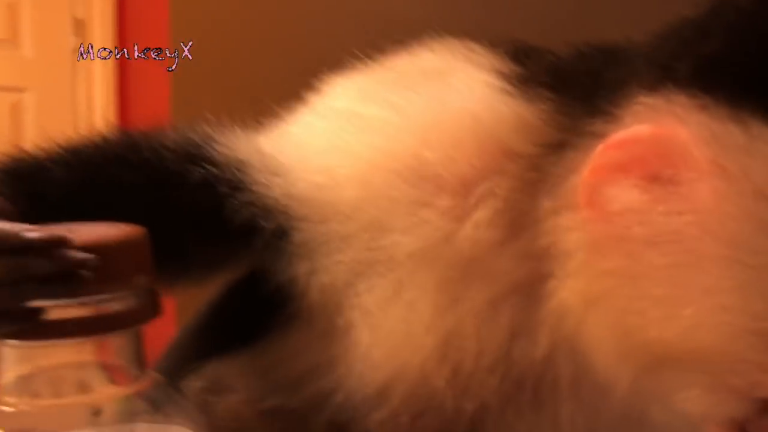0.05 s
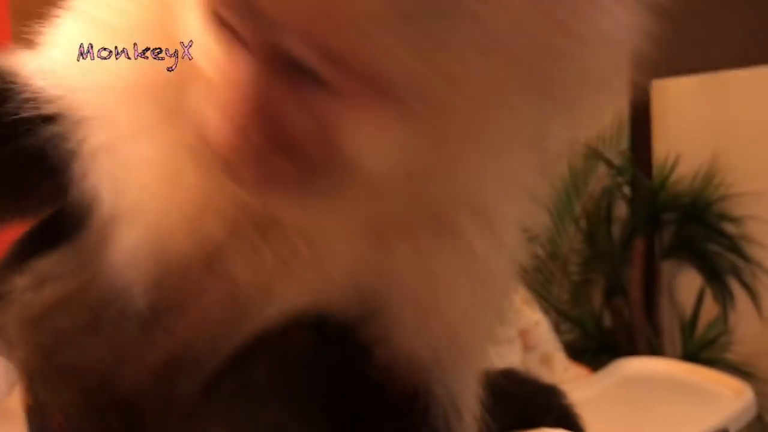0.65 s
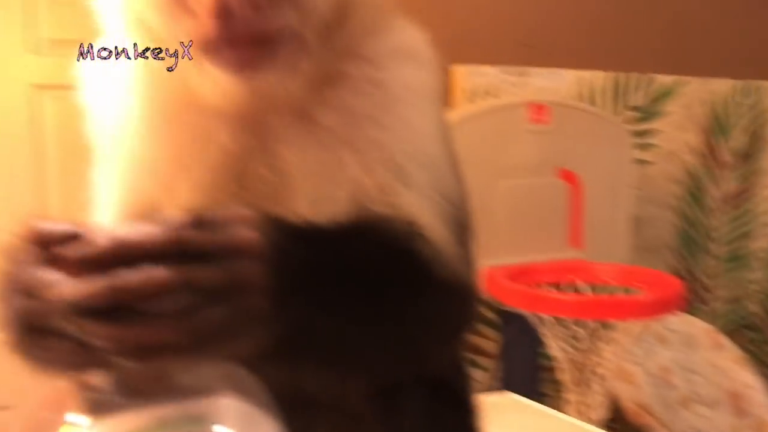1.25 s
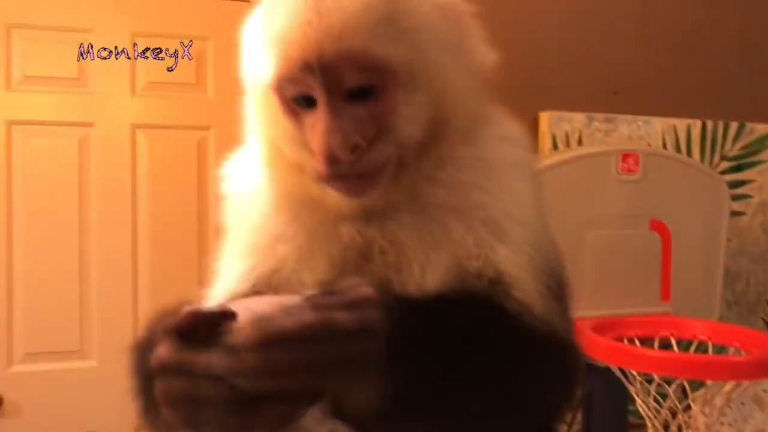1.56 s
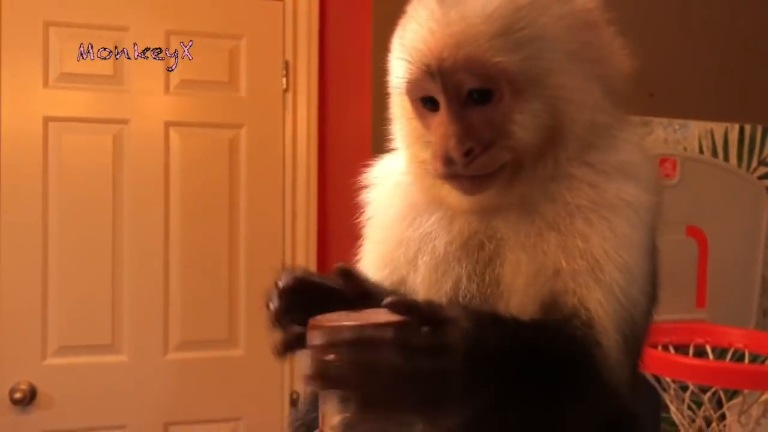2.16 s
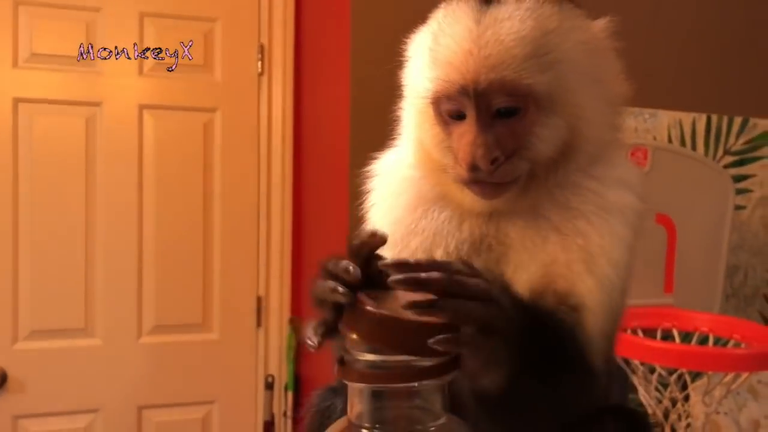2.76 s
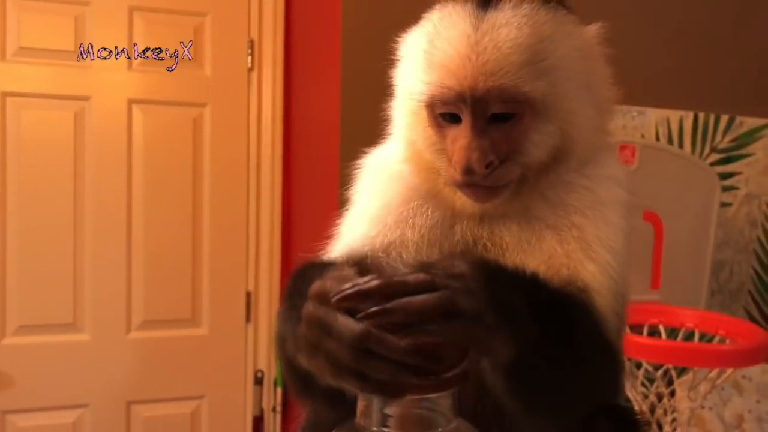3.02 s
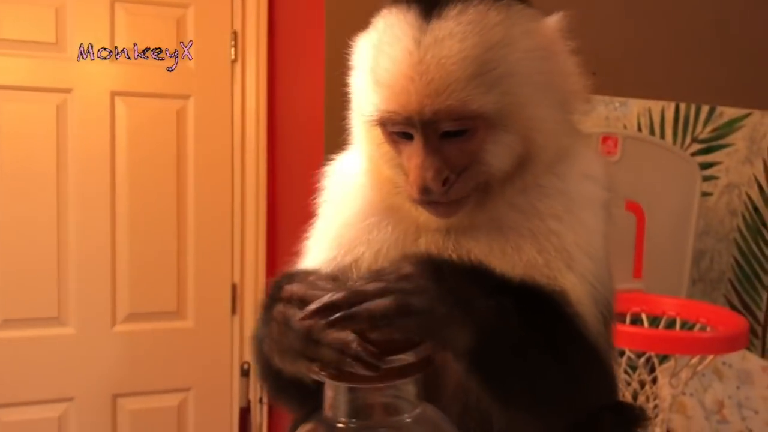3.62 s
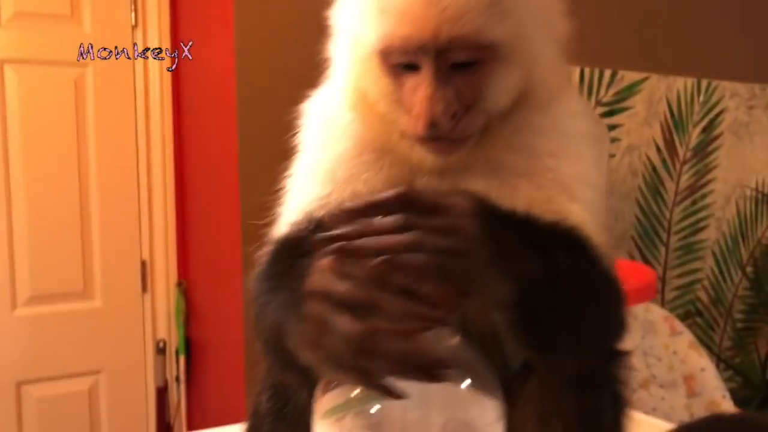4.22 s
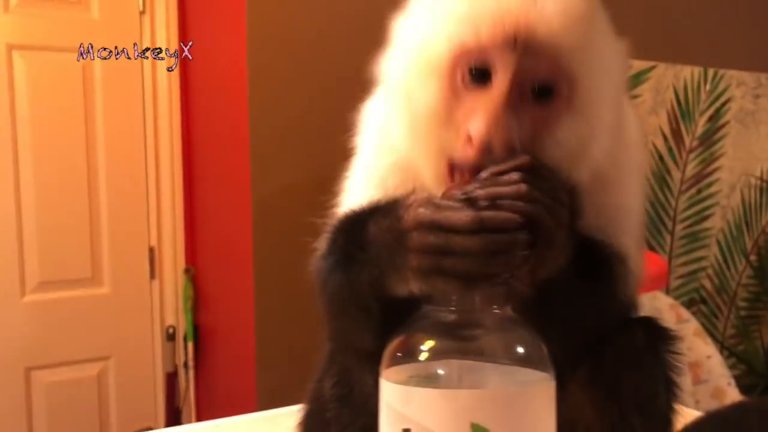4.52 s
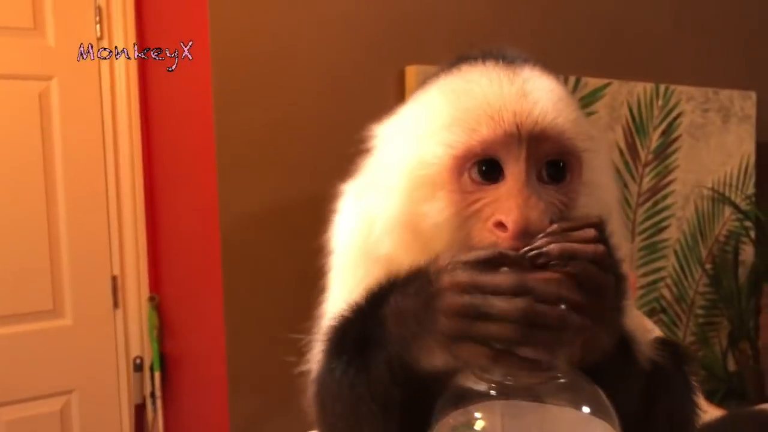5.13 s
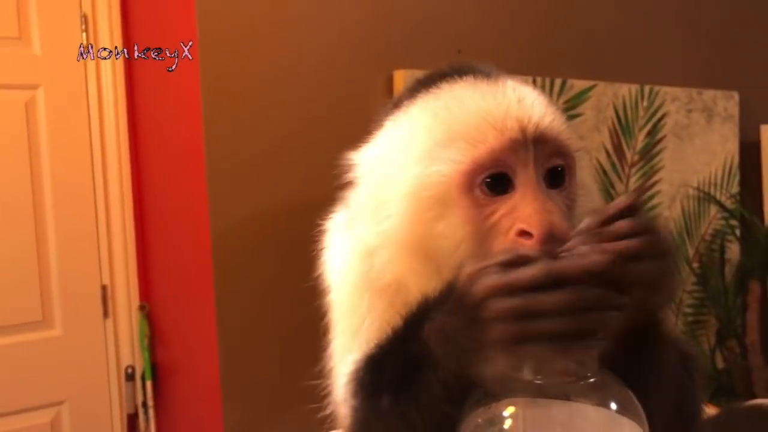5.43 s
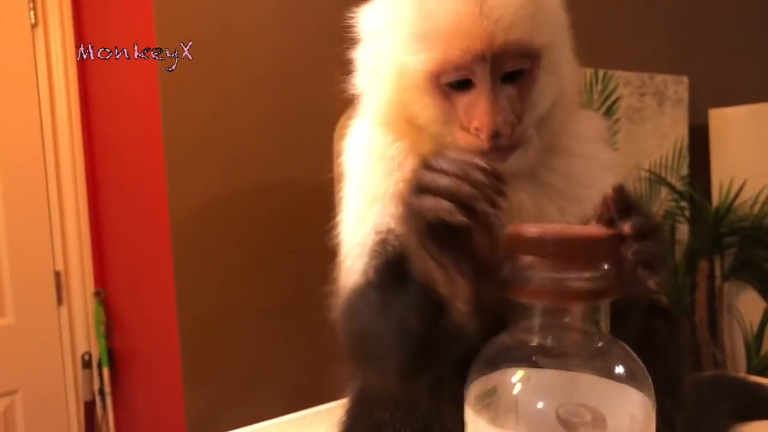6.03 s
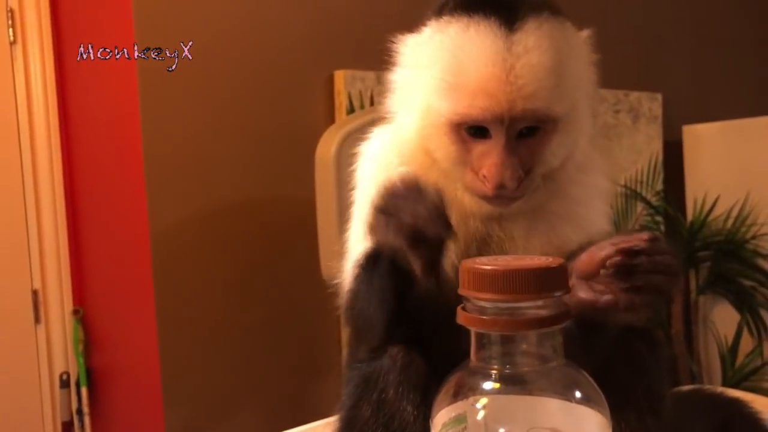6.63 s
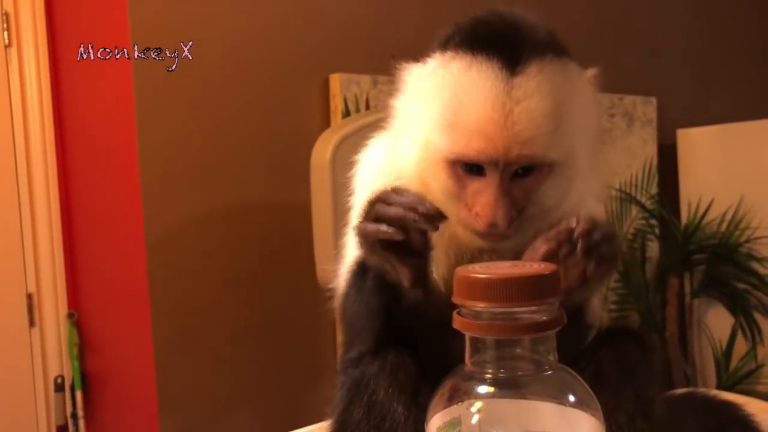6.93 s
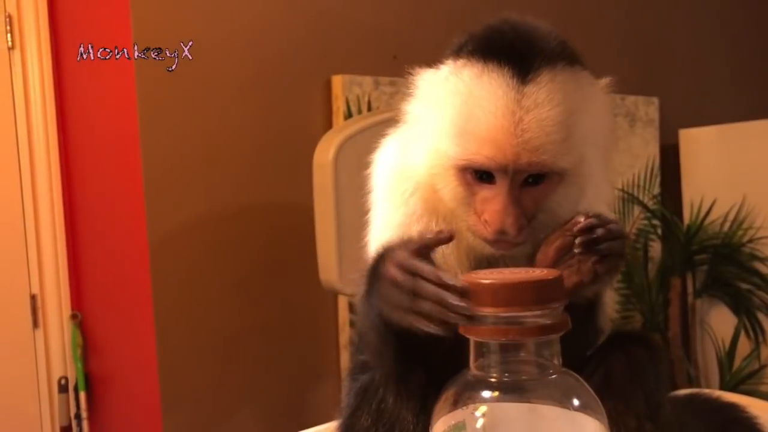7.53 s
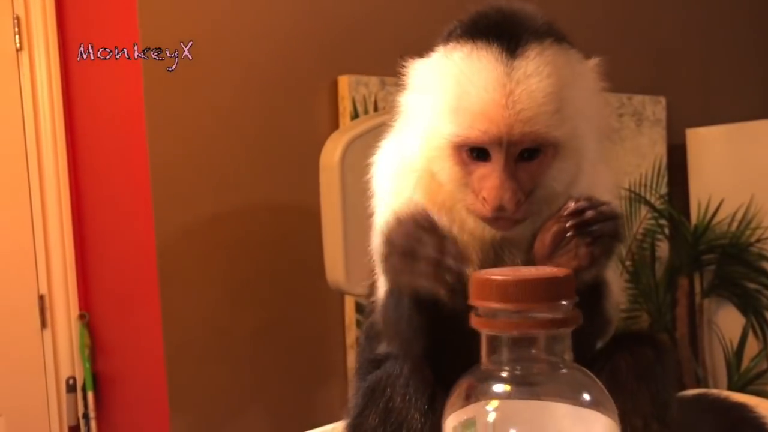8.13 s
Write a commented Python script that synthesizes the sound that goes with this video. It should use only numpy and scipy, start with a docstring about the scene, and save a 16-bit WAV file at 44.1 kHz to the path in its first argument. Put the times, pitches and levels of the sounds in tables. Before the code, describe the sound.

Irregular clicks, taps and rasping twists come from a plastic screw cap as a monkey works at an empty bottle, heard up close in a small room. Something bumps farther away near the start. The monkey squeaks three times, later four times, then once more, each a very short, high, falling chirp. Between these, fur rustles faintly and the bottle rings hollow when held loosely, as it does on the final taps.

```python
"""A small room, the microphone close to a table where a capuchin monkey fiddles with an empty plastic bottle.
A first tap rings hollow, then something bumps across the room. Fur brushes; nails and teeth tap the screw
cap, fingers rub and twist it, and the strength and hardness of each touch divide the sound among body, wall
and cap. Three high, falling chirps come near 1.7 s and four near 3.9 s; the grip loosens and the bottle
booms. A last chirp at 5.2 s, then the handling goes on and ends on hollow taps around 8 s."""
import sys
import numpy as np
from scipy import signal
from scipy.fft import rfft, irfft
from scipy.io import wavfile
from scipy.ndimage import uniform_filter1d

SR = 44100
rng = np.random.default_rng(int(sys.argv[2]) if len(sys.argv) > 2 else 0)


def put_to_file(sound):
    """Save the sound as 16-bit audio at rate SR, in the file named by the first command-line argument."""
    columns = np.atleast_2d(sound).T  # one column per channel
    safe = np.clip(columns, -1, 1)
    whole_steps = np.round(safe * 32767)
    wavfile.write(sys.argv[1], SR, whole_steps.astype(np.int16))


N = 369116
TOP_HZ = 16050


def amp(db):
    return 10 ** (np.asarray(db) / 20)


def unit_rms(x):
    return x / np.sqrt(np.mean(x ** 2) + 1e-20)


def curve_at(points, hz):
    """Interpolate (frequency [Hz], value) points on a log-frequency axis."""
    point_hz, value = np.transpose(points)
    return np.interp(np.log(hz + 1), np.log(point_hz + 1), value)


def add(mix, start_s, sound):
    part = mix[max(round(start_s * SR), 0):][:len(sound)]
    part += sound[:len(part)]


def seconds(length):
    return np.arange(int(length * SR)) / SR


def band(x, edges_hz, order=2):
    sos = signal.butter(order, np.clip(edges_hz, 10, SR / 2 - 10), "band", fs=SR, output="sos")
    return signal.sosfilt(sos, x)


def coloured_noise(spectrum):
    gain = amp(curve_at(spectrum, np.fft.rfftfreq(N, 1 / SR)))
    return unit_rms(irfft(rfft(rng.standard_normal(N)) * gain, N))


# The still room at the microphone: (frequency [Hz], relative density [dB])
ROOM_TONE_SPECTRUM = [(25, -27), (60, -1.5), (130, 0.5), (220, 0), (330, -6), (700, -9), (2000, -15.5),
                      (5000, -18.5), (16000, -27.5)]
def room_tone(level_db=-72.5):
    """Quiet room rumble and microphone hiss."""
    return amp(level_db) * coloured_noise(ROOM_TONE_SPECTRUM)


# Reverberation of the small room: (frequency [Hz], time to fall 60 dB [s])
ROOM_DECAY = [(150, 0.42), (500, 0.68), (1500, 0.37), (5000, 0.31), (9000, 0.33), (16000, 0.17)]
def room_echo(x, first_s=0.0018, build_s=0.0054, reflections_per_s=4000):
    """Dense reflections of random sign off the nearby walls, each band dying at its own speed."""
    reflections = rng.standard_normal(SR) * (rng.random(SR) < reflections_per_s / SR)
    hz, t, spectrum = signal.stft(reflections, SR, nperseg=256)
    decay = amp(-60 * t / curve_at(ROOM_DECAY, hz)[:, None])
    tail = signal.istft(spectrum * decay, SR, nperseg=256)[1]
    tail *= np.clip((np.arange(len(tail)) / SR - first_s) / build_s, 0, 1)
    return signal.fftconvolve(x, tail / np.linalg.norm(tail))[:N]


def scattered_echo(x, turns_per_s=130, split_hz=650):
    """The bottle throws each instant of its treble another way, so the echoes blend smoothly."""
    turn = 2 * np.pi * turns_per_s * np.arange(N) / SR
    bass = band(x, (20, split_hz), order=3)
    treble = band(x, (split_hz, TOP_HZ), order=3)
    bass_echo = room_echo(bass)
    treble_echo = sum(room_echo(treble * np.cos(turn + k * np.pi / 3)) for k in range(3))
    return bass_echo + treble_echo / np.sqrt(3 / 2)


def far_knock(start_s=0.2875, level_db=-34, decay_s=0.0037):
    """Something bumps across the room, far from the microphone: one dull knock."""
    out, t = np.zeros(N), seconds(.03)
    thump = rng.standard_normal(len(t)) * np.exp(-t / decay_s)
    dull = band(band(thump, (400, 2200), order=1), (300, 5500), order=4)
    add(out, start_s, amp(level_db) * dull)
    return out


# Sweeps over fur, close by: (middle time [s], half width [s], level [dB])
FUR_SWEEPS = [(.83, 0.18, -64.5), (1.02, .08, -71), (1.45, 0.36, -71.5), (2.45, 0.077, -61),
              (5.939, 0.08, -56.5)]
# Colour of their hiss: (frequency [Hz], relative density [dB])
FUR_SPECTRUM = [(200, -16.5), (1000, 2), (4000, 1.5), (9000, -5), (16000, -13)]
def fur():
    """An arm or palm brushes over fur: a smooth hiss that swells and fades with each sweep."""
    t = np.arange(N) / SR
    swell = sum(amp(db) * np.exp(-((t - middle) / width) ** 2) for middle, width, db in FUR_SWEEPS)
    return swell * coloured_noise(FUR_SPECTRUM)


# Calls at the table: (time [s], length [s], first pitch [Hz], last pitch [Hz], level before mouth [dB])
CHIRPS = [(1.6223, 0.011, 9080, 8000, -21), (1.7, 0.018, 8200, 7220, -14),
          (1.7628, .017, 4570, 1970, -19.5), (3.804, 0.011, 9300, 8830, -32.5),
          (3.8572, .015, 9730, 9450, -21.5), (3.9123, .011, 9630, 8260, -20.5),
          (3.9811, 0.019, 7080, 4740, -17), (5.171, 0.017, 8790, 8160, -13.5)]
# Resonances of the monkey's mouth: (frequency [Hz], gain [dB])
MOUTH_RESPONSE = [(2000, -24.5), (3200, -12.5), (4150, 11), (4800, -5), (5650, 9.5), (6500, -5),
                  (8000, -3.5), (11500, 4), (15500, -0.5)]
def chirps(overtone_db=-5, rolloff_db=-7, jitter=0.0054, tick_db=-22):
    """A nearly pure whistle sags through the mouth's resonances; a tiny tick marks its start and stop."""
    out, tick_t = np.zeros(N), seconds(.01)
    harmonic = np.arange(1, 8)[:, None]
    harmonic_db = np.where(harmonic == 1, 0, overtone_db + rolloff_db * (harmonic - 2))
    for start, length, first_hz, last_hz, db in CHIRPS:
        progress = seconds(length) / length
        depth = max(1 - last_hz / first_hz, .01)
        lateness = .52 / depth ** .72  # a deep fall starts at once, a shallow one only near the end
        hz = first_hz * (1 - depth * progress ** lateness)
        hz *= 1 + jitter * unit_rms(uniform_filter1d(rng.standard_normal(len(hz)), size=40))
        gains = amp(harmonic_db + curve_at(MOUTH_RESPONSE, harmonic * hz)) * (harmonic * hz < SR / 2)
        whistle = (gains * np.sin(2 * np.pi * harmonic * np.cumsum(hz) / SR)).sum(0)
        add(out, start, amp(db) * whistle * signal.windows.tukey(len(hz), .3))
        for tick_s in (start - .001, start + length):
            tick = rng.standard_normal(len(tick_t)) * np.exp(-tick_t / .0007)
            add(out, tick_s, amp(db + tick_db) * band(tick, (2800, 7000)))
    return out


def ring(force, modes, spread, low_cut_ratio=0.53, uneven_db=2):
    """Damped modes, shifted and weighted anew by each grip; a small body radiates little below them."""
    t = np.arange(len(force)) / SR
    hz, db, t60 = np.transpose(modes)[:, :, None]
    hz = hz * (1 + spread * rng.standard_normal(hz.shape))
    weight = rng.choice([-1, 1], hz.shape) * amp(uneven_db * rng.standard_normal(hz.shape))
    response = (weight * amp(db - 60 * t / t60) * np.sin(2 * np.pi * hz * t)).sum(0)
    sound = signal.fftconvolve(force, response)[:len(force)]
    return band(sound, (low_cut_ratio * hz.min(), TOP_HZ), order=3)


# The grip is loose and the body rings freely: (start time [s], end time [s])
LOOSE_GRIP = [(.1, 0.27), (4.1, 4.7), (7.98, 8.3)]
# Air and body of the loosely held bottle: (frequency [Hz], level [dB], time to fall 60 dB [s])
BOOM_MODES = [(242, -4, .24), (315, -3.5, .11), (350, -6, .14), (460, -7, .06)]
# Bottle pressed down, thudding with the table: (frequency [Hz], level [dB], time to fall 60 dB [s])
THUD_MODES = [(128, -14.5, 0.063), (196, -1, 0.071), (337, 7.5, 0.047), (500, -9.5, 0.09)]
# Thin plastic wall: (frequency [Hz], level [dB], time to fall 60 dB [s])
WALL_MODES = [(560, -4.5, 0.0085), (775, -4, 0.012), (848.6, -4.5, 0.014), (1123, -2, .016),
              (1290.7, -3, 0.036), (1514, -6, 0.018), (2020, -0.5, .013), (2430, -2, 0.015)]
# Stiff screw cap: (frequency [Hz], level [dB], time to fall 60 dB [s])
CAP_MODES = [(3020, -13.5, .016), (3492, -5, .009), (4023, -5, .006), (5150, -0.5, 0.0031),
             (7100, -2.5, 0.0032)]
def bottle(force, time_s, edge_hz=(8300, 15000)):
    """One force sounds four voices: hollow body, wall, cap and the rasp of the cap's ribbed edge."""
    loose = any(start <= time_s <= end for start, end in LOOSE_GRIP)
    body = ring(force, BOOM_MODES, spread=0.019) if loose else ring(force, THUD_MODES, spread=0.11)
    wall = ring(force, WALL_MODES, spread=.025)
    cap = ring(force, CAP_MODES, spread=.05)
    return np.array([body, wall, cap, band(force, edge_hz)])


# Slow rise and fall of the hollow body against the wall: (time [s], gain [dB])
HOLLOWNESS = [(.12, 5.5), (.6, -12.5), (.95, -4.5), (1.25, -9.5), (2.5, -11), (2.72, -0.5), (2.94, -0.5),
              (3.1, -12.5), (3.33, -1.5), (3.95, -1.5), (4.16, 4.5), (4.4, -1.5), (5.55, -3.5),
              (5.93, -9.5), (6.25, 0), (6.7, -11.5), (7.9, -10), (8, 4.5)]
def voice_levels(time_s, strength_db, hardness_db, usual_db=-48, body_growth=.72, edge_growth=1.23):
    """A touch divides among body, wall, cap and edge, in dB: stronger is sharper rather than deeper."""
    hollow_db = np.interp(time_s, *np.transpose(HOLLOWNESS))
    body_db = usual_db + body_growth * (strength_db - usual_db) + hollow_db
    cap_db = strength_db + hardness_db
    edge_db = usual_db + edge_growth * (cap_db - usual_db)
    return np.array([body_db, strength_db, cap_db, edge_db])


# Rubs and twists close to the microphone: (start time [s], end time [s], strength [dB], hardness [dB])
RUBS = [(.57, .76, -66, -36.5), (0.745, 0.853, -61.5, -16), (0.943, 1.071, -52, -17),
        (1.114, 1.313, -68.5, -15), (1.654, 1.89, -59.5, -24), (1.858, 2.121, -57.5, -10.5),
        (2.211, 2.614, -57.5, -10), (2.66, 2.762, -54.5, -9.5), (2.811, 2.872, -56.5, -11.5),
        (3.01, 3.189, -63, -8), (3.22, 3.278, -61.5, -10), (3.301, 3.34, -53, -10),
        (3.518, 3.568, -48.5, -10), (3.841, 4.137, -61.5, -1.5), (4.12, 4.199, -44.5, -4.5),
        (4.201, 4.37, -59.5, -14), (4.407, 4.443, -51, -3), (4.501, 4.6, -59, -11),
        (4.759, 4.89, -65, -8.5), (4.957, 5.05, -53, -5.5), (5.06, 5.21, -64.5, -3.5),
        (5.381, 5.5, -70.5, -2.5), (5.496, 5.552, -51, -7.5), (5.739, 5.811, -57, -13.5),
        (5.849, 6.096, -57.5, -11.5), (6.215, 6.296, -55, -7), (6.919, 6.981, -47.5, -9.5),
        (7.326, 7.356, -50, -12), (7.606, 7.702, -55.5, -7), (7.927, 7.998, -59, 0.5),
        (8.207, 8.245, -54.5, 3)]
def rubs(slips_per_s=130, uneven_db=4.5, slide_db=-21, glide=0.52, voice_trim_db=(0, 1.1, 0, -2)):
    """Skin and screw thread slide with a soft hiss and catch in many small uneven slips."""
    out = np.zeros(N)
    for start, end, strength_db, hardness_db in RUBS:
        levels_db = voice_levels((start + end) / 2, strength_db, hardness_db)
        length = end - start
        t = seconds(length + .25)
        catches = rng.random(len(t)) < slips_per_s / SR
        slips = catches * amp(uneven_db * np.minimum(rng.exponential(1, len(t)), 3))
        crackle = np.sqrt(signal.lfilter([.05], [1, -.95], slips ** 2))  # each slip rasps about 1 ms
        # a light stroke (more cap than body) glides; a firm twist mostly crackles
        slide = amp(slide_db + glide * (levels_db[2] - levels_db[0]))
        pressure = np.sqrt(np.clip(np.sin(np.pi * np.minimum(t / length, 1)), 0, 1))
        voices = bottle(pressure * (crackle + slide) * rng.standard_normal(len(t)), start)
        voices /= np.sqrt(np.mean(voices[:, t < length] ** 2, 1, keepdims=True))
        add(out, start, amp(levels_db + voice_trim_db) @ voices)
    return out


# Taps on cap or bottle, close to the microphone; a nail is hard, a fingertip soft:
# (time [s], contact time [s], strength [dB], hardness [dB])
TAPS = [(0.1249, 0.0015, -48.5, -7), (0.597, 0.0082, -59.5, -32), (0.6962, 0.0058, -58, -32),
        (0.8247, 0.002, -51.5, -16), (0.9533, 0.0045, -50, -7), (1.0211, 0.0086, -48.5, 0),
        (1.0989, 0.0017, -38, 3), (1.1021, 0.0035, -30, -7.5), (1.281, 0.0011, -57.5, 11),
        (1.6469, .0018, -45, 14.5), (1.8426, 0.0033, -37, -6), (1.925, 0.005, -41.5, -14),
        (2, .0019, -50, 1), (2.3213, 0.0046, -38.5, -9.5), (2.506, 0.01, -47, -8),
        (2.81, 0.0072, -51.5, -10), (2.8281, 0.0056, -51, -3.5), (2.9393, 0.0048, -58.5, -2.5),
        (3.0146, 0.0023, -60, 7), (3.0262, 0.0054, -50.5, 0.5), (3.063, 0.0025, -49.5, -11.5),
        (3.095, 0.0028, -53, -4.5), (3.1403, 0.0038, -57, -6), (3.3347, 0.0036, -53, -18),
        (3.4488, 0.0029, -42, -16), (3.4664, 0.0022, -40, -11), (3.5048, 0.0018, -45.5, -15),
        (3.5774, 0.0065, -40.5, -6), (3.5835, 0.0044, -36, -0.5), (3.9442, 0.0043, -39.5, -9),
        (4.156, .007, -42, 2), (4.168, 0.0022, -39.5, -2), (4.2506, 0.003, -43.5, -4.5),
        (4.2786, 0.0032, -43, -3), (4.3912, 0.0021, -53, 6), (4.412, 0.0028, -50.5, 2.5),
        (4.5122, .005, -51.5, -13), (4.7592, 0.0036, -51, -2), (4.7938, 0.0073, -56.5, -8.5),
        (4.8154, 0.00097, -54.5, 6), (4.8999, 0.0032, -45.5, -2), (4.9119, 0.0022, -38.5, -8),
        (5.193, .003, -50.5, -4), (5.228, 0.0012, -27.5, -13), (5.2498, .003, -31, -1.5),
        (5.536, 0.0021, -43.5, -9), (5.558, 0.00097, -47, -3.5), (5.761, 0.0022, -52.5, -3),
        (5.8361, 0.0031, -48.5, -12.5), (6.134, 0.0066, -49, -10), (6.2167, .0042, -52.5, -7.5),
        (6.273, .0056, -53, -4.5), (6.69, .006, -57.5, -5), (6.9617, .0044, -48, 4.5),
        (7.2707, 0.0072, -56, 2.5), (7.3183, 0.0024, -59.5, 10), (7.363, 0.003, -46.5, -6),
        (7.6027, 0.0061, -44, -4), (7.693, 0.0037, -47.5, -23), (7.9076, 0.0078, -48, -9.5),
        (7.9903, 0.0033, -46.5, -8), (8.0418, 0.0019, -51.5, -9.5), (8.1866, 0.0031, -53.5, -10),
        (8.274, 0.0039, -42, -4.5)]
def taps(rise_s=.0005, usual_contact_s=0.0058, snap=0.57, drag_db=-23, drag_db_per_doubling=7.5,
         drag_s=0.042, voice_trim_db=(-1.5, -1.5, -1.5, -9)):
    """A brief rasp with one clean snap as the plastic lets go; after longer contact a finger drags more."""
    out, t = np.zeros(N), seconds(.35)
    attack_samples = int(.02 * SR)
    for start, contact_s, strength_db, hardness_db in TAPS:
        touch = (1 - np.exp(-t / rise_s)) * np.exp(-(t / contact_s) ** 1.5)
        drag_gain = amp(drag_db + drag_db_per_doubling * np.log2(contact_s / usual_contact_s))
        drag = drag_gain * np.minimum(t / contact_s, 1) * np.exp(-t / drag_s)
        force = (touch + drag) * rng.standard_normal(len(t))
        force[int((rise_s + contact_s / 4) * SR)] += snap * np.linalg.norm(force)
        voices = bottle(force, start)
        voices /= np.sqrt(np.mean(voices[:, :attack_samples] ** 2, 1, keepdims=True))
        levels_db = voice_levels(start, strength_db, hardness_db)
        add(out, start - rise_s, amp(levels_db + voice_trim_db) @ voices)
    return out


def scene(handling_echo_db=-14.5, call_echo_db=-20.5, knock_direct_db=-9):
    """At one microphone: monkey and bottle close and nearly dry, the knock mostly through the room."""
    handling = taps() + rubs() + fur()
    calls, knock = chirps(), far_knock()
    echoes = amp(handling_echo_db) * scattered_echo(handling)
    echoes += room_echo(amp(call_echo_db) * calls + knock)
    return (handling + calls + amp(knock_direct_db) * knock + echoes + room_tone())[None]


def record(dry):
    """The recorder's band limit."""
    low_pass = signal.firwin(511, TOP_HZ, window=("kaiser", 8), fs=SR)
    return signal.oaconvolve(dry, low_pass[None], "same")


dry = scene()
out = record(dry)
put_to_file(out)
```